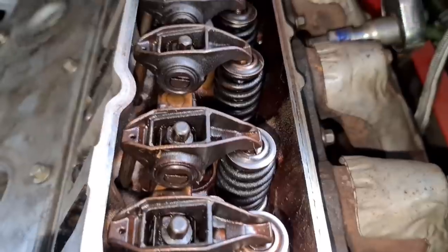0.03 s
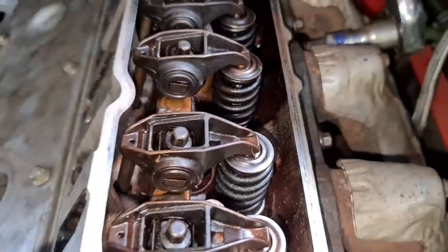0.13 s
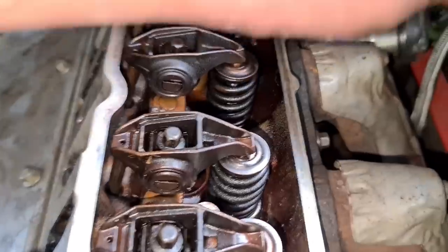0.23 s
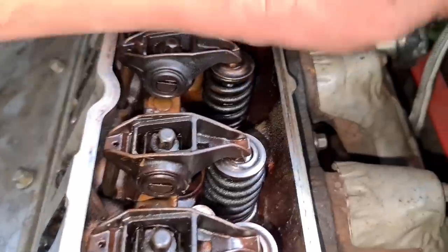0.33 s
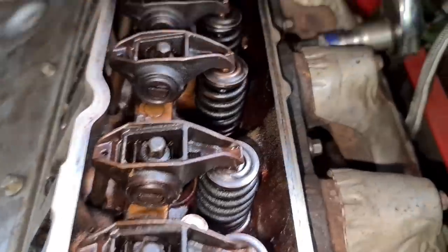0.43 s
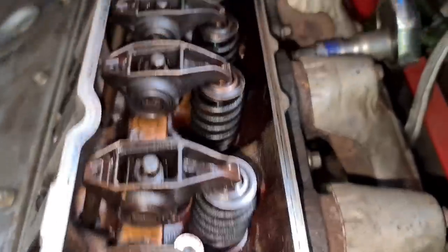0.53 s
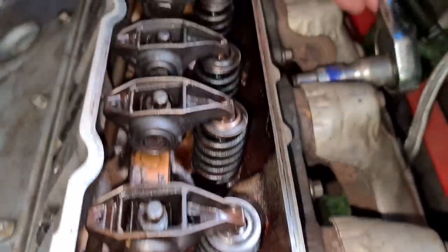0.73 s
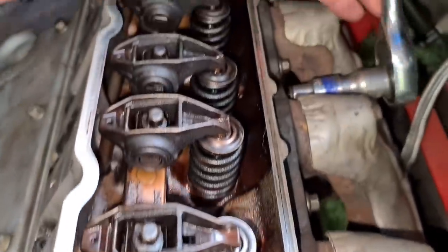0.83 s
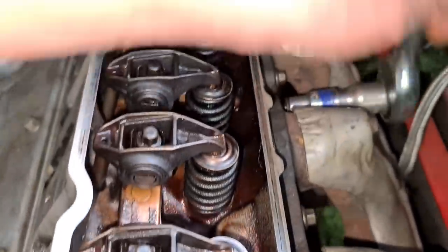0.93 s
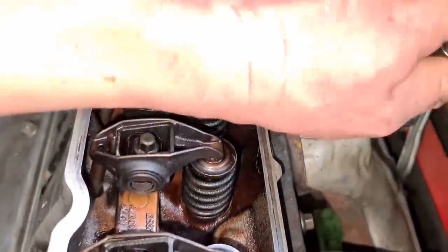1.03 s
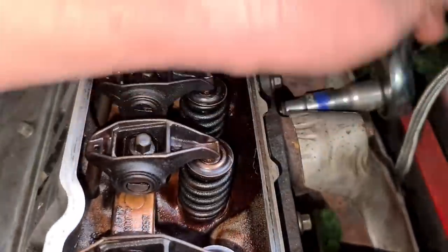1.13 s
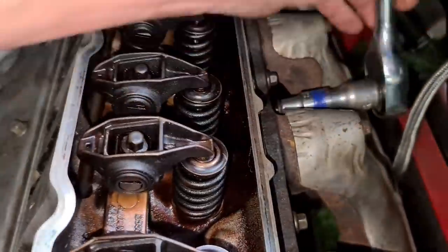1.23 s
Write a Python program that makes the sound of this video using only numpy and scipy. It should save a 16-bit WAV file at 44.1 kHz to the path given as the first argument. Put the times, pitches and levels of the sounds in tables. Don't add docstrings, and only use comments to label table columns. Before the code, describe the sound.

Ratchet wrench snapping over its teeth twice, with small metal knocks and faint squeaks between

```python
import sys
import numpy as np
from scipy import signal
from scipy.fft import rfft, irfft, next_fast_len
from scipy.io import wavfile
from scipy.ndimage import uniform_filter1d, minimum_filter1d, map_coordinates

SR = 44100
rng = np.random.default_rng(int(sys.argv[2]) if len(sys.argv) > 2 else 0)


def put_to_file(sound):
    columns = np.atleast_2d(sound).T
    safe = np.clip(columns, -1, 1)
    whole_steps = np.round(safe * 32767)
    wavfile.write(sys.argv[1], SR, whole_steps.astype(np.int16))


def volts_from_decibels(level):
    exponent = np.asarray(level, float) / 20
    return 10 ** exponent


N = 57330


def unit(x):
    return x / np.sqrt(np.mean(x ** 2) + 1e-20)


def along(points, hz):
    f, value = np.transpose(points)
    return np.interp(np.log(hz + 1), np.log(f + 1), value)


def curve(rows):
    s, value = np.transpose(rows)
    return np.interp(np.arange(N) / SR, s, value)


def wobble(rate):
    knots = rng.standard_normal(int(N * rate / SR) + 4)
    return map_coordinates(knots, [np.arange(N) * rate / SR])


def unsteady(shape, blur_hz):
    return np.sqrt(2 * np.pi * blur_hz / SR) * np.cumsum(rng.standard_normal(shape), axis=-1)


def filtered(x, response):
    m = next_fast_len(x.shape[-1] + 8192)
    spectrum = rfft(x, m) * response(np.fft.rfftfreq(m, 1 / SR))
    return irfft(spectrum, m)[..., :x.shape[-1]]


def peaks(table):
    def gain(f):
        power = sum(volts_from_decibels(2 * db) * (f * width) ** 2 / ((hz * hz - f * f) ** 2 + (f * width) ** 2)
                    for hz, width, db in table)
        return np.sqrt(power)
    return gain


# pitch in Hz, left-right correlation.
LIKENESS = [(60, 1), (240, 0.7), (950, 1), (3770, -0.25), (15000, -0.084)]


def pair(response):
    def mid_and_side(hz):
        turn = np.arccos(np.clip(along(LIKENESS, hz), -1, 1)) / 2
        return response(hz) * [np.cos(turn), np.sin(turn)]
    mid, side = filtered(rng.standard_normal((2, N)), mid_and_side)
    return unit(np.array([mid + side, mid - side]))


def ports(hz):
    return -1.664 * np.minimum(hz / 2690, 1) * np.array([[-.5], [.5]])


def ring(modes, t, tilt_db=0, blur_hz=30):
    hz, db, t60 = np.transpose(modes)[:, :, None, None]
    per_port = (len(modes), 2, 1)
    level = db + tilt_db * np.log2(hz / 3000) + 1.5 * rng.standard_normal(per_port)
    hz = hz * (1 + .006 * rng.standard_normal(hz.shape))
    phase = 2 * np.pi * rng.random(hz.shape) + ports(hz) + 0.54 * rng.standard_normal(per_port)
    phase = phase + unsteady((len(modes), 1, len(t)), blur_hz)
    onset = 1 - np.exp(-t * hz)
    return volts_from_decibels(level - 60 * t / t60) * np.sin(2 * np.pi * hz * t + phase) * onset


def energy(x):
    return np.linalg.norm(x, axis=2, keepdims=True)


# pitch in Hz, t60 in seconds.
GARAGE_T60 = [(500, 0.56), (2000, 0.17), (6000, 0.075), (13000, 0.064), (16000, 0.023)]


def reverberation(near):
    size = near.shape[1]
    late_db, late_times = -15, 2.8
    hz, s, z = signal.stft(rng.standard_normal((2, size)), SR, nperseg=256)
    decay_db = -60 * s / along(GARAGE_T60, hz)[:, None]
    decay = volts_from_decibels(decay_db) + volts_from_decibels(late_db + decay_db / late_times)
    tail = signal.istft(z * decay, SR, nperseg=256)[1][:, :size]
    return signal.fftconvolve(near, tail / np.linalg.norm(tail[0]), axes=1)[:, :size]


# pitch in Hz, level in dB per Hz.
CRACK_COLOUR = [(410, -23), (700, -19.5), (3200, -15), (3560, -12), (6120, -12.5), (13200, -14),
                (16500, -25.5)]
LEAD = 512
RISE_S = .002


def strike(s, db, parts, crack_db, tilt_db, chatter_s, cut_hz, t):
    lead_db, lead_s = -25, 0.033
    snap_db, snap_s = 14, 0.004
    spiky_db, wet_db = 2, -14
    after = np.maximum(t - LEAD / SR, 0)
    blow = volts_from_decibels(-60 * after / chatter_s) + volts_from_decibels(snap_db - 60 * after / snap_s)
    climb = (after == 0) * volts_from_decibels(lead_db - 60 * (LEAD / SR - t) / lead_s)
    fade = np.minimum(after / RISE_S, 1) ** 2 * blow + climb
    spikes = np.repeat(rng.standard_normal(len(t) // 16 + 1), 16)[:len(t)]
    contacts = fade * volts_from_decibels(spiky_db * spikes)

    modes = np.concatenate(parts)
    force = contacts ** 3 * rng.standard_normal(len(t))
    rung = signal.fftconvolve(modes, force[None, None], axes=2)[..., :len(t)]
    rung = (rung * energy(modes) / energy(rung)).sum(axis=0)

    def colour(hz):
        return volts_from_decibels(along(CRACK_COLOUR, hz) + tilt_db * np.log2((hz + 300) / 3000))
    crack = filtered(rng.standard_normal((2, len(t))) * contacts, colour)
    crack *= volts_from_decibels(crack_db) * np.linalg.norm(fade) / fade.max() / np.linalg.norm(crack[0])

    near = volts_from_decibels(db) * filtered(rung + crack, lambda hz: hz ** 2 / (hz ** 2 + cut_hz ** 2))
    out = np.zeros((2, N + SR))
    k = round((s - RISE_S / 2) * SR) - LEAD
    out[:, k:k + len(t)] = near
    out[:, k + 200:k + 200 + len(t)] += volts_from_decibels(wet_db) * reverberation(near)
    return out[:, :N]


# pitch in Hz, level in dB, t60 in seconds.
GEAR_MODES = [(4900, -6, .015), (7900, -4, .012), (8800, -4, .012), (9800, -3, .012), (10700, 0, .015),
              (11100, 2, .014), (11900, -3, .012), (12800, -2, .012), (13400, 0, .016), (14300, -2, .012),
              (15100, -3, .008)]
SOCKET_MODES = [(1990, -12.5, 0.058), (2740, -12, 0.07), (2921, -1, 0.043), (3045, -4.5, .025),
                (3260, -9.5, 0.011), (3790, -14, 0.016)]
SEATED_MODES = [(1954, -18, 0.055), (2972, -3, 0.04), (3194, -0.5, 0.0225), (3197, -1, 0.023),
                (3894, -13.5, 0.011)]
PAWL_MODES = [(5600, -9, .018), (6090, -4, .022), (6170, 0, .027), (6180, -23, .13), (6280, -6, .02)]
BAR_MODES = [(1030, -19, .35), (1075, -21, .35)]
# start in seconds, peak level in dB,
# socket level in dB, pawl level in dB, chatter t60 in seconds.
TOOTH_HITS = [(0.175, -25.5, -2.5, -8, 0.033), (0.212, -16, -5, -6.5, 0.033), (0.2170, -5, -7.5, 4, 0.025),
              (0.2204, -15.5, 5.5, -3, 0.025), (0.2584, -6, -5, -5, 0.02), (0.2658, -21.5, 7, -7.5, 0.02),
              (0.2945, -22.5, -11, -8, 0.01), (0.2946, -7.5, -7.5, -3, 0.022), (0.3, -15, -4.5, -2.5, 0.03),
              (0.3139, -28, -1.5, -9, 0.017), (0.341, -15, -12.5, -3.5, 0.026),
              (0.3448, -10.5, -8.5, -5, 0.034), (0.348, -12, 0, -8, 0.035), (0.4848, -41, 22, 6, 0.0083),
              (0.9194, -31, 7.5, -4, 0.2), (0.9584, -6, -3.5, -7, 0.037), (0.963, -14, 0.5, -4, 0.037),
              (0.9988, -9.5, 1.5, -4.5, 0.016), (1.001, -8, 3, 3, 0.017), (1.0375, -9, -1.5, -10, 0.037),
              (1.0398, -7.5, -3.5, -8.5, 0.0266), (1.098, -18.5, -9, 3.5, 0.035),
              (1.1057, -9.5, -9, 7.5, 0.038), (1.1126, -18, -2, 6, 0.018)]


def ratchet():
    t = np.arange(SR // 7) / SR
    tooth_db, gear_db, bar_db, crack_db = -8, -4, -13, -3
    out = np.zeros((2, N))
    for s, db, socket_db, pawl_db, chatter_s in TOOTH_HITS:
        socket = SOCKET_MODES if s < .6 else SEATED_MODES
        parts = [volts_from_decibels(gear_db) * ring(GEAR_MODES, t),
                 volts_from_decibels(socket_db) * ring(socket, t),
                 volts_from_decibels(pawl_db) * ring(PAWL_MODES, t),
                 volts_from_decibels(bar_db) * ring(BAR_MODES, t, 0, 0)]
        out += strike(s, db + tooth_db, parts, crack_db, 0, chatter_s, 1540, t)
    return out


# pitch in Hz, level in dB, t60 in seconds.
BLOCK_MODES = [(830, -6, .03), (1250, -4, .03), (1550, -6, .03), (1880, -4, .035), (2250, -6, .03),
               (2780, -1, .03), (3050, 0, .035), (3440, -2, .025), (4430, -4, .025), (5000, -5, .025),
               (5600, -3, .025), (6800, -8, .02), (9200, -10, .02)]
# start in seconds, peak level in dB,
# brightness in dB per octave, pawl level in dB, chatter t60 in seconds.
KNOCK_HITS = [(0.138, -31.5, -3, -33, 0.11), (0.234, -24, 1, -9.5, 0.11), (0.442, -41.5, 5, -14, 0.02),
              (0.453, -28, -1.5, -12, 0.078), (0.482, -25, -2, -15.5, 0.075), (0.849, -23, 1, 0, 0.085),
              (0.901, -34.5, -4, -24, 0.072), (1.03, -31.5, -11.5, -35, 0.077),
              (1.047, -30, 0.5, -18, 0.074), (1.197, -23.5, -2.5, -22.5, 0.065), (1.27, -44, -2, -17, 0.12)]


def knocks():
    t = np.arange(SR // 6) / SR
    knock_db, crack_db = -5.5, -1
    out = np.zeros((2, N))
    for s, db, tilt_db, pawl_db, chatter_s in KNOCK_HITS:
        parts = [ring(BLOCK_MODES, t, tilt_db) / 2,
                 volts_from_decibels(pawl_db) * ring(PAWL_MODES, t),
                 ring(BAR_MODES, t, 0, 0)]
        out += strike(s, db + knock_db, parts, crack_db, tilt_db - 6.5, chatter_s, 1100, t)
    return out


# centre in seconds, pitch in Hz, length in seconds.
GRIP_SQUEAKS = [(.24, 570, .035), (.24, 1250, .03), (.24, 1800, .04), (.24, 3000, .04), (.262, 1020, .02),
                (.853, 5600, .004), (.86, 3000, .025), (.91, 1850, .025), (.93, 1550, .024),
                (.936, 3150, .018), (1.04, 1280, .025), (1.045, 1880, .025), (1.055, 2950, .03),
                (1.2, 830, .02), (1.2, 1230, .025), (1.275, 355, .04), (1.275, 1600, .04)]
GRIP_SQUEAK_DB = [-51, -42, -43, -33.5, -44.5, -29, -45.5, -46.5, -43, -38.5, -47, -42, -34, -53, -52, -56,
                  -57.5]


def squeaks():
    t = np.arange(N) / SR
    out = np.zeros((2, N))
    for (s, hz, length), db in zip(GRIP_SQUEAKS, GRIP_SQUEAK_DB):
        swell = np.exp(-(2 * (t - s) / length) ** 2)
        tone = np.sin(2 * np.pi * hz * t + unsteady(N, 35) + ports(hz))
        out += np.sqrt(2) * volts_from_decibels(db) * swell * tone
    return out


# time in seconds, level in dB.
DRAG_DB = [(0, -61.5), (.13, -59), (.35, -52), (.5, -75.5), (.6, -92), (.8, -89), (.86, -59.5), (1.15, -60),
           (1.3, -60)]
# pitch in Hz, width in Hz, level in dB.
THREAD_PEAKS = [(373, 130, -4.5), (990, 350, -9.5), (1791, 97, 3.5), (2210, 470, -12), (2860, 130, -29),
                (4000, 95, -12)]
# time in seconds, level in dB.
SLIDE_DB = [(.62, -100), (.65, -69.5), (.74, -77), (.8, -84.5), (.84, -57), (.9, -54.5), (1.2, -52.5),
            (1.3, -64.5)]
# pitch in Hz, width in Hz, level in dB.
SLIDE_PEAKS = [(1820, 2800, 1), (5770, 350, 8.5), (6000, 400, -4), (8910, 210, -15)]


def friction():
    thread = pair(lambda hz: peaks(THREAD_PEAKS)(hz) / (1 + (hz / 3840) ** 4))
    drag = volts_from_decibels(curve(DRAG_DB) + 1.8 * wobble(54)) * thread
    hiss = pair(lambda hz: peaks(SLIDE_PEAKS)(hz) / (1 + (hz / 11000) ** 6))
    return drag + volts_from_decibels(curve(SLIDE_DB) + 0.96 * wobble(91)) * hiss


# pitch in Hz, level in dB per Hz.
RUMBLE_COLOUR = [(15, -42.5), (25, -11.5), (87, -13.5), (463, -16.5), (641, -28), (754, -34), (1700, -45.5),
                 (2350, -45.5), (16000, -41)]
# pitch in Hz, width in Hz, level in dB.
HUM_TONES = [(75.3, 11, 5.5), (119.4, 16, 0)]
# time in seconds, level in dB.
HUM_STRENGTH = [(0.0, -72), (0.036, -64.5), (0.114, -74), (0.266, -59.5), (0.296, -67.5), (0.44, -62),
                (0.484, -89.5), (0.52, -65.5), (0.63, -67), (0.654, -76.5), (0.73, -85.5), (0.774, -63.5),
                (0.894, -72), (1.068, -62.5), (1.088, -71.5), (1.3, -67.5)]


def garage():
    rumble = volts_from_decibels(-65 + 1.1 * wobble(8.3)) * pair(lambda hz: volts_from_decibels(along(RUMBLE_COLOUR, hz)))
    t = np.arange(N) / SR
    hum = np.zeros((2, N))
    for hz, width, db in HUM_TONES:
        phase = unsteady(N, width) + [[-.2], [.2]]
        hum += volts_from_decibels(curve(HUM_STRENGTH) + db) * np.sin(2 * np.pi * hz * t + phase)
    return rumble + hum


# pitch in Hz, left-right difference in dB.
SIDE_DB = [(700, 1), (1300, -4), (3000, 3), (5000, -4), (15000, -1)]


def scene():
    tool = ratchet() + knocks() + squeaks()
    tool = filtered(tool, lambda hz: volts_from_decibels(along(SIDE_DB, hz) * np.array([[.5], [-.5]])))
    return tool + friction() + garage()


def gated(x):
    treble_hz, treble_db, air_hz, air_db = 3700, -24, 14900, -21
    hz, _, z = signal.stft(x, SR, nperseg=256)
    power = np.mean(np.abs(z) ** 2, axis=0)
    band = np.repeat(power[:-1].reshape(32, 4, -1).mean(axis=1), 4, axis=0)
    band = uniform_filter1d(band, size=2, axis=1)
    treble = power[hz > treble_hz].mean(axis=0)
    ahead = -minimum_filter1d(-treble, size=9, origin=-4)
    around = -minimum_filter1d(-treble, size=31)
    draws = np.kron(rng.random((32, len(treble) // 2 + 1)), np.ones((4, 2)))[:, :len(treble)]
    pitch = hz[:-1, None]
    faint_treble = (draws < .5) & (band < ahead * volts_from_decibels(2 * treble_db)) & (pitch > treble_hz)
    faint_air = (band < around * volts_from_decibels(2 * air_db)) & (pitch > air_hz)
    faint = faint_treble | faint_air
    return signal.istft(z * np.vstack([~faint, faint[:1]]), SR, nperseg=256)[1][:, :N]


def low_pass(x):
    return signal.sosfilt(signal.butter(12, 16800, fs=SR, output="sos"), x)


def record(dry):
    def microphone(hz):
        return (hz < 16700) * (hz > 24) / (1 + (hz / 15600) ** 12)
    mix = filtered(gated(dry), microphone)
    return low_pass(mix)


dry = scene()
out = record(dry)
put_to_file(out)
```